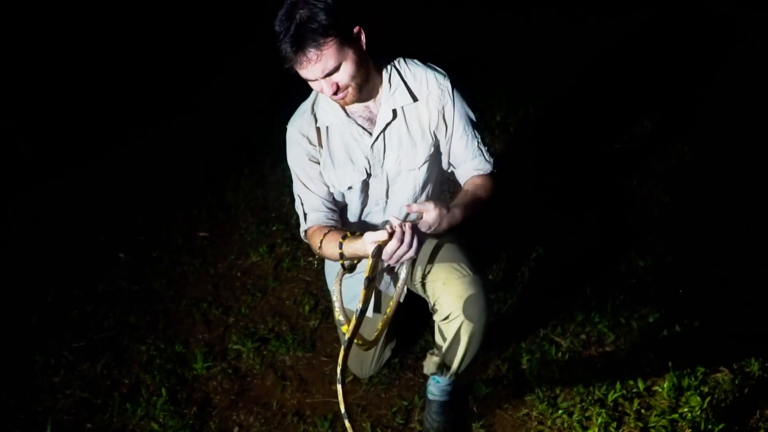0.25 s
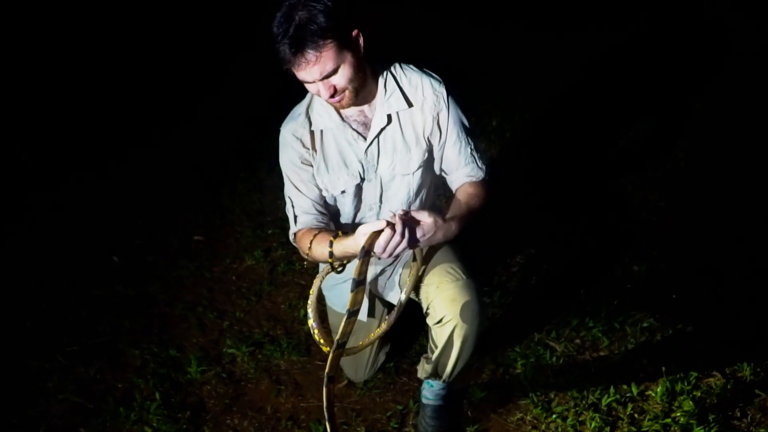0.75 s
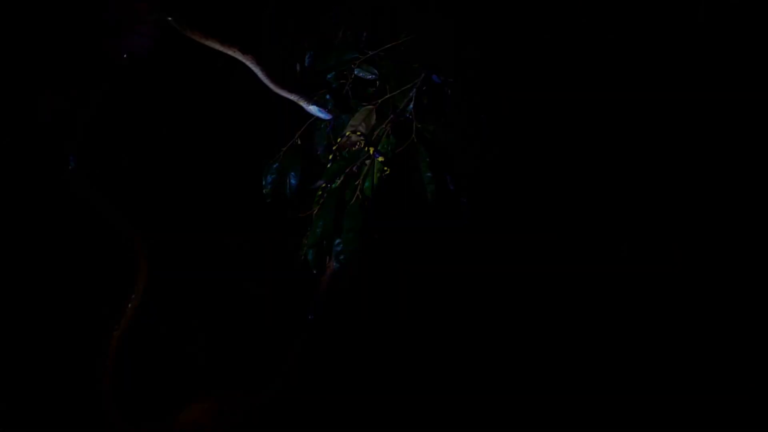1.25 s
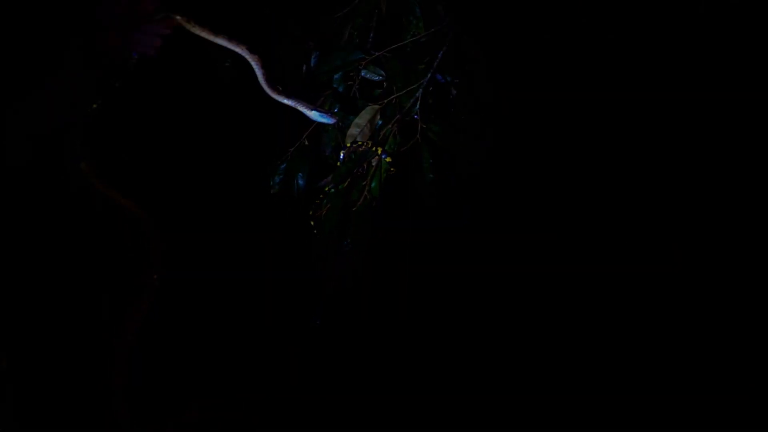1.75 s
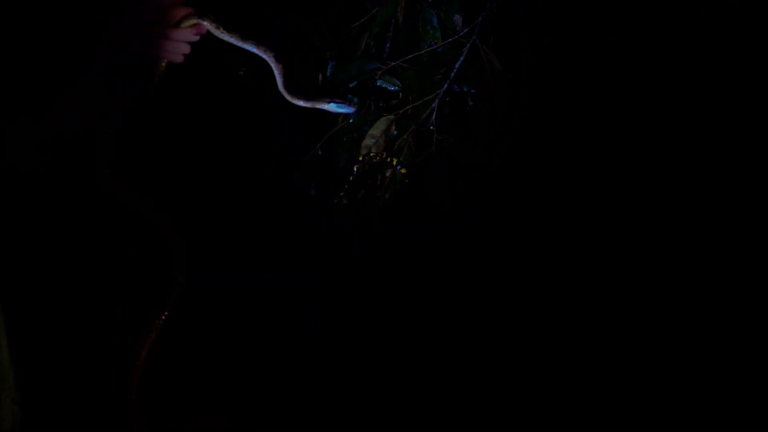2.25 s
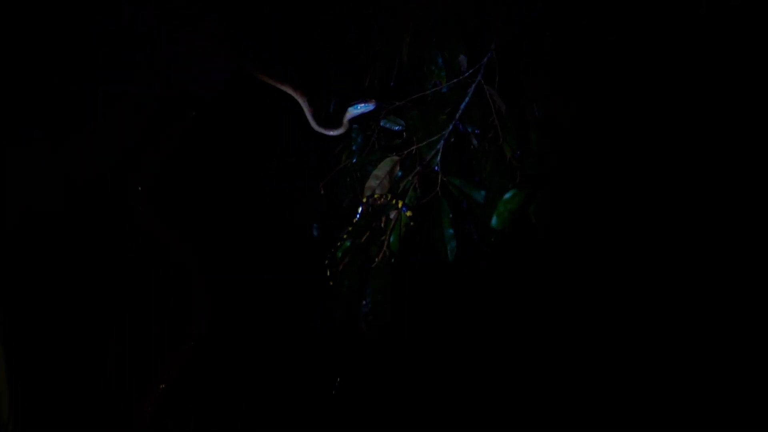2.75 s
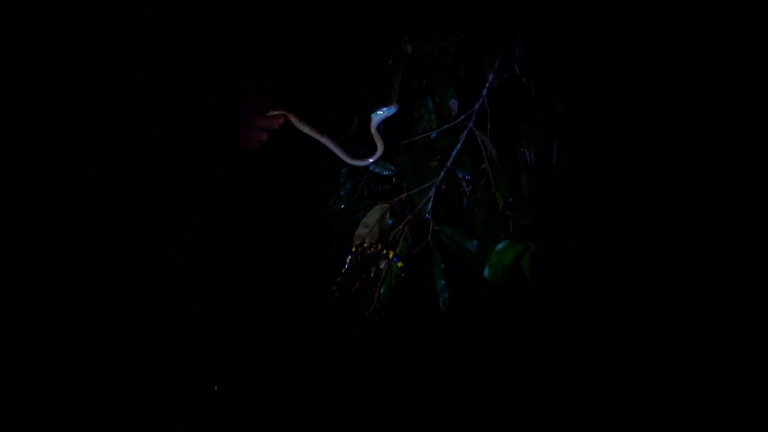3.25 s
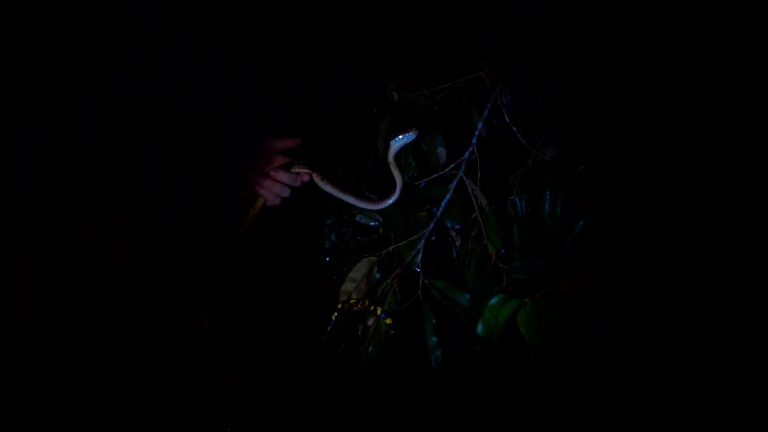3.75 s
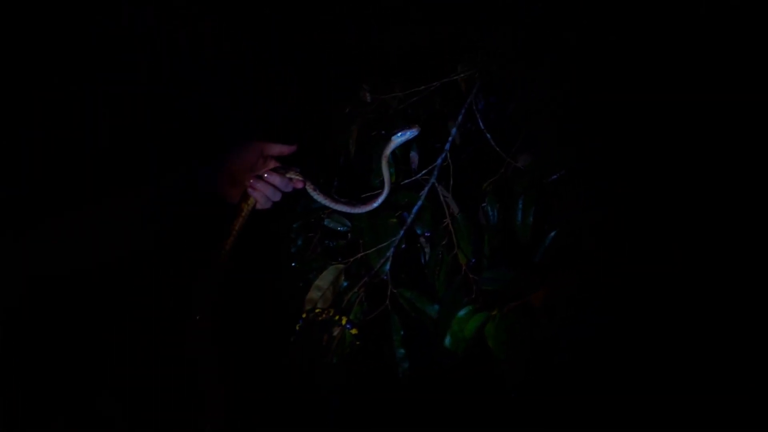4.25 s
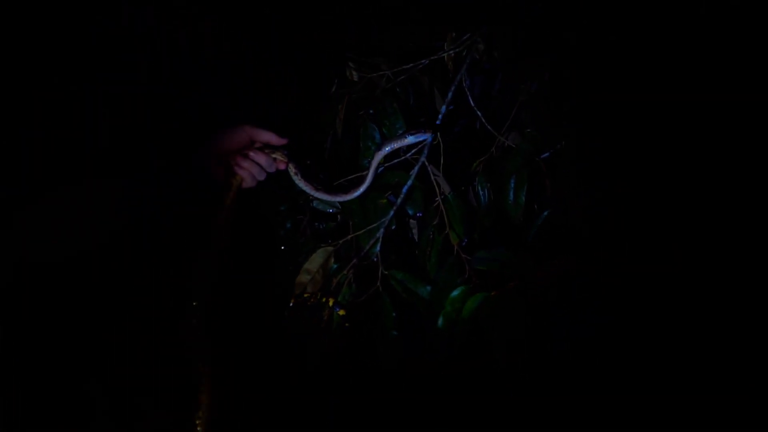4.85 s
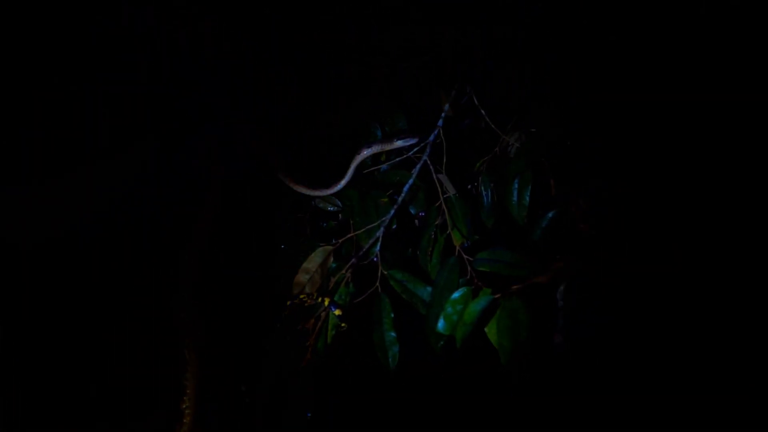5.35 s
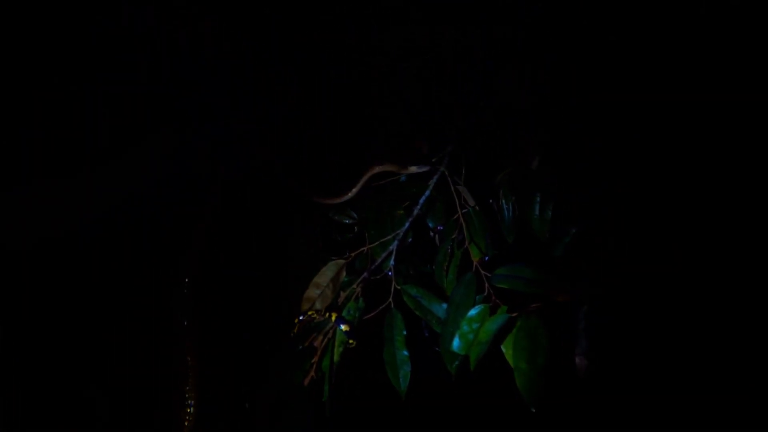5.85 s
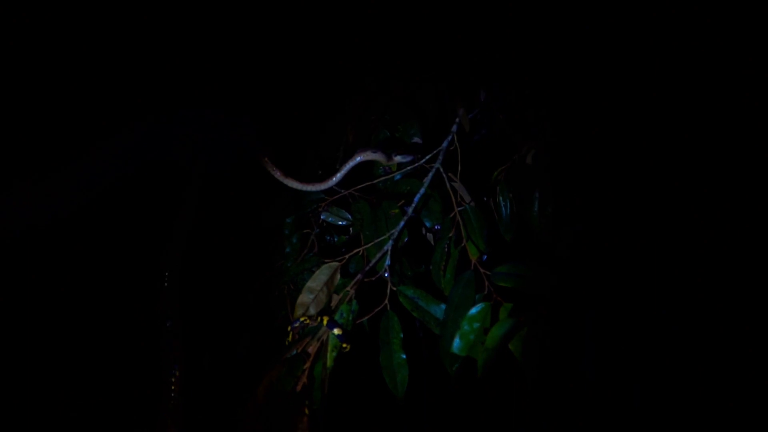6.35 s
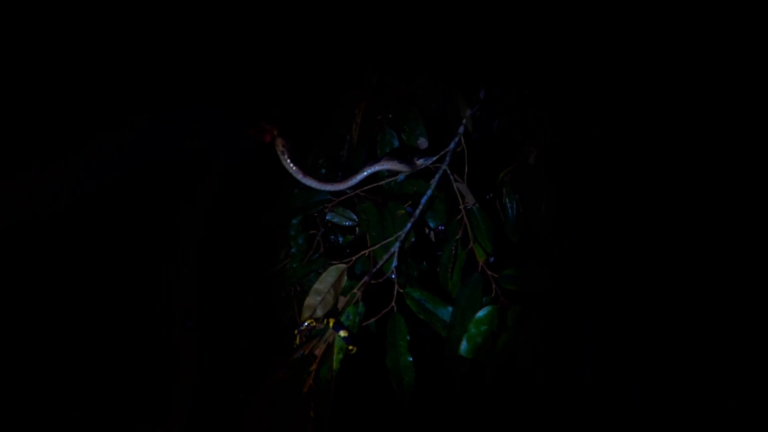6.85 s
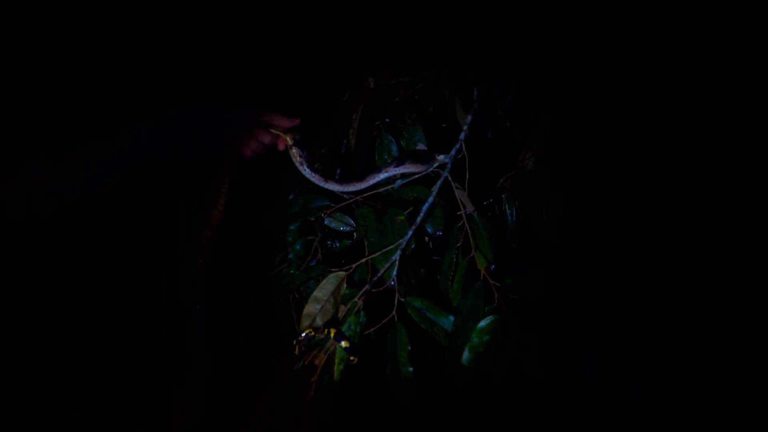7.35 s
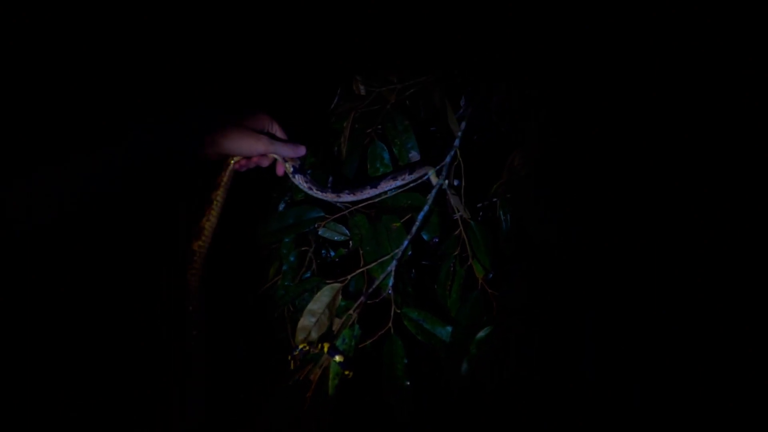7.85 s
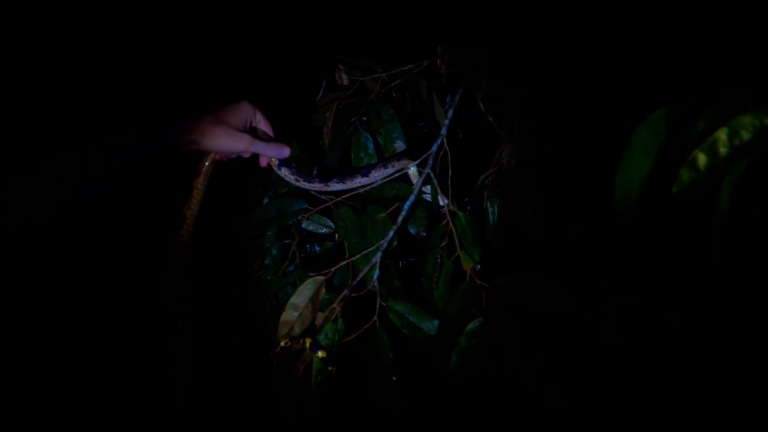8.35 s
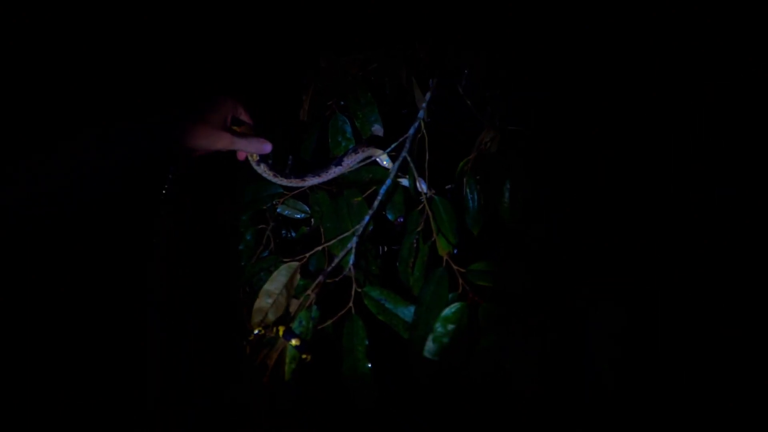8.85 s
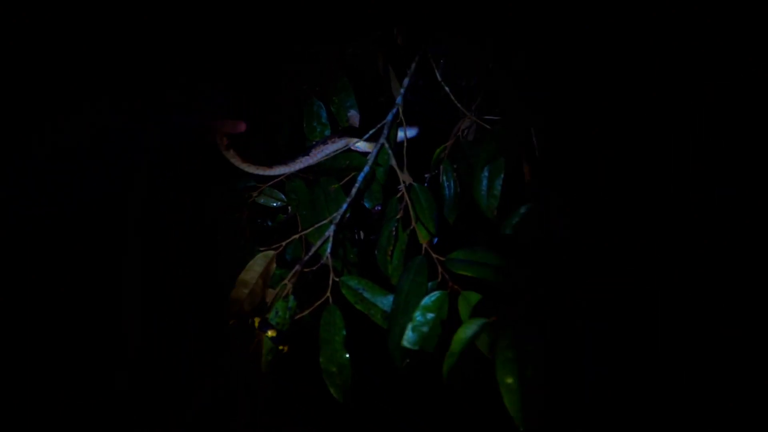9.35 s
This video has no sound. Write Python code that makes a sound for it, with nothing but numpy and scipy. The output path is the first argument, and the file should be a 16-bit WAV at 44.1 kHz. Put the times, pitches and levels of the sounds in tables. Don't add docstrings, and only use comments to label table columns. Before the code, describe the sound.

A stereo pair in a night forest hears insect and frog choirs trilling, with a rattling frog on the left. A hand gives a brief hollow knock, then a dry rasp. The scene cuts abruptly to a fuller, brighter chorus: close crickets chirp in phrases, katydids zip, twigs snap, a ticker swells, a frog croaks on the right and a small frog peeps steadily over soft air.

```python
import sys
import numpy as np
from scipy import signal
from scipy.fft import rfft, irfft, next_fast_len
from scipy.io import wavfile
from scipy.ndimage import uniform_filter1d

SR = 44100
rng = np.random.default_rng(int(sys.argv[2]) if len(sys.argv) > 2 else 0)


def wav_out(sig):
    wavfile.write(sys.argv[1], SR, np.round(np.clip(np.atleast_2d(sig).T, -1, 1) * 32767).astype(np.int16))


def volts_from_db(level):
    exponent = np.asarray(level, float) / 20
    return 10 ** exponent


N = 422919
CUT_S = 1.294


def evened(x):
    return x / np.sqrt(np.mean(abs(x) ** 2) + 1e-20)


def read(points, hz):
    f, value = np.transpose(points)
    return np.interp(np.log(hz + 1), np.log(f + 1), value)


def sides(pan_db):
    return volts_from_db(np.array([[pan_db / 2], [-pan_db / 2]]))


def add(mix, s, sound, pan_db=0):
    part = mix[:, round(s * SR):][:, :sound.shape[-1]]
    part += sides(pan_db) * sound[..., :part.shape[1]]


def alike(left, other, same):
    same = np.clip(same, -1, 1)
    return np.array([left, same * left + np.sqrt(1 - same ** 2) * other])


def wander(rows, size, count):
    points = rng.standard_normal((rows, count))
    return np.array([np.interp(np.linspace(0, count - 1, size), np.arange(count), p) for p in points])


def band(size, hz, width, same=.3):
    a, b = rng.standard_normal((2, size))
    bell = np.exp(-.25 * ((np.fft.rfftfreq(size, 1 / SR) - hz) / width) ** 2)
    return evened(irfft(rfft(alike(a, b, same)) * bell, size))


def swells(t, rows, half_s):
    return sum(db * np.exp(-.5 * ((t - s) / half_s) ** 2) for s, db in rows)


# pitch in Hz, level in dB per Hz.
AIR_LOW = [(15, -58), (25, -24), (116, -13), (171, -11.5), (284, -3.5), (395, -3), (571, -0.5), (910, -2.5),
           (1660, -3), (2600, -6), (3380, -24), (5720, -120)]
AIR_TOP = [(3200, -24), (8000, -7), (11000, -15), (13500, -10), (16000, -10.5)]
# pitch in Hz, likeness from -1 to 1.
AIR_LIKENESS = [(60, 0.94), (120, 0.98), (240, 0.77), (480, 0.13), (950, -0.15), (1890, 0.034),
                (3770, 0.37), (7520, 0.42), (15000, 0.049)]
# centre in seconds, rise in dB.
GUSTS = [
    (.75, 3.8),
    (2.3, 3),
    (5.0, 2),
    (7.5, 5.7),
]
# centre in seconds, change in dB.
HUSHES = [
    (1.7, -4),
    (5.1, -3),
    (5.6, -3),
    (6.3, -18),
    (6.5, -10),
    (6.8, -6),
    (7.33, -4),
    (8.58, -3),
    (9.17, -10),
]


def air():
    gust_s, hush_s, hush_hz = 0.18, 0.061, 14100
    rumble_grows_db_per_s = 1.5
    frames, hz = N // 256 + 5, np.fft.rfftfreq(1024, 1 / SR)
    t = np.arange(frames) * 256 / SR
    a, b, c, d, patches = rng.standard_normal((frames, 513, 5)).T
    patches = uniform_filter1d(patches, size=10, axis=0)
    patches = evened(uniform_filter1d(patches, size=10, axis=1))
    stir = (swells(t, GUSTS, gust_s) - .8) * np.exp(-hz / 900)[:, None]
    stir += rumble_grows_db_per_s * (t - 4.8) * np.exp(-hz / 90)[:, None]
    hush = swells(t, HUSHES, hush_s) / (1 + (hush_hz / (hz + 1)) ** 24)[:, None]
    flicker = wander(1, frames, count=frames // 3)
    z = alike(a + 1j * b, c + 1j * d, read(AIR_LIKENESS, hz)[:, None])
    colour_db = read(AIR_LOW[:-1] + AIR_TOP, hz)[:, None]
    z *= volts_from_db(colour_db + 0.66 * patches + 0.48 * flicker + stir + hush)
    wash = signal.istft(z, nperseg=1024, noverlap=768)[1][:, :N]
    return volts_from_db(-53 + 4.5) * evened(wash)


def haze(size, fill, same):
    a, b = rng.standard_normal((2, size))
    f = np.fft.rfftfreq(size, 1 / SR)
    power = 0
    for hz, width, db in fill:
        bell = np.exp(-.5 * ((f - hz) / width) ** 2)
        power = power + volts_from_db(2 * db) * bell * SR / (2 * np.sqrt(2 * np.pi) * width)
    return irfft(rfft(alike(a, b, same)) * np.sqrt(power), size)


def choir(size, hz, spread, fall, pulses, far, pan_db, same, count):
    t = np.arange(size // 12) * 12 / SR
    steps = len(t) // 700 + 3
    tempo, near, start = rng.standard_normal((count, 3)).T[..., None]
    pitch = np.tan(np.linspace(-1.1, 1.1, count))[:, None]
    beat = 2 * np.pi * pulses * (1 + .12 * tempo) * t + 9 * start + .5 * wander(count, len(t), count=steps)
    stroke = (.5 + .5 * np.cos(beat)) ** 1.5
    slide = fall / pulses * np.cos(beat)
    drift = 1.5 * wander(count, len(t), count=steps * 3)
    effort_db = 4.2 * wander(count, len(t), count=steps // 3 + 2)
    voices = volts_from_db(2.6 * near - 1.5 * pitch ** 2 + effort_db) * stroke
    voices = voices * np.exp(1j * (2 * np.pi * spread * pitch * t + slide + drift))
    scatter = np.sqrt(-2 * np.log(np.clip(abs(same), .01, .99)))
    bearing = np.exp(1j * scatter * rng.standard_normal((count, 1)))
    pair = [voices.sum(0), np.sign(same) * (voices * bearing).sum(0)]
    pair = signal.resample(pair, size, axis=1)
    close = (pair * np.exp(2j * np.pi * hz * np.arange(size) / SR)).real
    close /= np.sqrt(abs(uniform_filter1d((close ** 2).mean(0), size=SR // 3)) + 1e-9)
    far = np.clip(far, 0, 1)
    blur = band(size, hz, np.hypot(spread, 0.65 * fall), same)
    return (np.sqrt(1 - far) * close + np.sqrt(far) * blur) * sides(pan_db)


# centre in Hz, spread of voices in Hz, fall in a pulse in Hz,
# pulses per second, far blurred share from 0 to 1, left-right in dB, likeness of the ears from -1 to 1.
CHOIRS = [
    [(3260, 58, 143, 41, 0.7, 2, 0.38), (4680, 250, 120, 36, 0.4, 19.5, 0.3),
     (6157, 240, 300, 70, 0.83, 2, 0.14), (9580, 330, 300, 110, 0.54, 1, 0.1)],
    [(3332, 48, 152.5, 30, 0.36, 3, 0.57), (5050, 120, 120, 66, 0.65, -1, 0.04),
     (6415, 230, 235, 72, 0.7, 0, -.1), (9833, 330, 365, 124, 0.64, 1, 0.19)],
]
# low, middle, high and katydid choir in dB.
REST = [
    (-38, -61, -41.5, -45.5),
    (-38, -41.5, -39.5, -40),
]
VOICES = [8, 12, 14, 12]
# centre in seconds, rise in dB.
SURGES = [
    [(0, 2), (.6, 2.5), (1.2, 1), (1.6, 0.5), (2.05, 1), (2.5, -0.5), (3.05, 3), (3.55, -1), (4.1, 0.5),
     (4.8, -4), (5.5, 0.5), (6.0, -1.5), (6.5, 2), (6.85, 0), (7.2, -1), (7.7, 3.5), (8.1, 1.5),
     (8.36, -2.5), (8.8, 2), (9.3, -1)],
    [(1.75, -1.5), (2.5, 3), (4.45, -3), (6.03, 1.5), (8.35, 1)],
    [(1.7, 1), (2.3, 0.5), (4.65, 1), (9.3, 0.3)],
    [(1.35, 0.5), (2.1, 0.5), (3.0, 1), (3.85, 2), (4.95, 1), (5.8, 2.5), (6.25, -1), (6.62, 2.5),
     (6.92, -1.5), (7.3, 1.5), (7.8, -1.5), (8.1, 1.5), (9.4, 2)],
]
SURGE_S = [0.21, 0.14, 0.11, 0.098]
# pitch in Hz, width in Hz, level in dB.
FILL = [
    [(3850, 170, -51), (4660, 370, -53), (13500, 1100, -49.5), (2860, 210, -59)],
    [(3860, 89, -41.5), (4060, 70, -52), (4600, 190, -49.5), (7580, 200, -50), (8800, 510, -48),
     (2966, 108, -53.5), (5480, 140, -54), (11340, 960, -53)],
]


def chorus():
    out, edges = np.zeros((2, N)), [0, round(CUT_S * SR), N]
    for k, (rest, choirs, fill) in enumerate(zip(REST, CHOIRS, FILL)):
        t = np.arange(edges[k], edges[k + 1]) / SR
        part = out[:, edges[k]:edges[k + 1]]
        size = next_fast_len(len(t), True)
        for db, surges, half_s, voice, count in zip(rest, SURGES, SURGE_S, choirs, VOICES):
            effort = np.interp(t, t[::256], volts_from_db(db + 2.5 + swells(t[::256], surges, half_s)))
            part += effort * choir(size, *voice, count=count)[:, :len(t)]
        part += haze(size, fill, same=0.11)[:, :len(t)]
    return out


# pulses per second, left-right in dB, pulse depth,
# pitch rise in a pulse in radians, level in dB.
SOLOS = [
    (37.7, -3, .95, .55, 0),
    (38.3, -3, .75, -.45, -2.6),
    (17, 3, .7, -.5, -3),
    (52.8, .3, .45, .42, -2.8),
    (66.1, -.4, .5, .05, -1.5),
    (19.5, -.3, .7, .05, -1.5),
]
# pitch in Hz, level in dB, phrase length in seconds,
# list of phrase starts in seconds.
SINGERS = [
    [(3743, -48.5, 1.08, [3.8, 6.3, 8.52]), (3743, -49, .65, [1.3]), (3911, -63, 1.22, [.05]),
     (4025, -54, .95, [1.85, 7.2]), (4025, -55, 1.4, [4.4]), (4100, -60, 1.4, [4.4]),
     (3957, -53, .55, [5.2]), (3668, -59, 1, [3.75, 6.25, 8.5])],
    [(3868, -46.5, .62, [2.98, 5, 5.57, 7.78, 8.33]), (3795, -49.5, .65, [2.3, 3, 5.5, 7.9]),
     (3911, -52, .39, [9.2])],
    [(3549, -46.5, .45, [1.45, 2.75, 5.15, 6.3, 7.7]), (3542, -49, .15, [9.15])],
]
OTHER_SINGERS = [
    [(5290, -47.5, .65, [4.33, 4.82]), (5296, -43.5, .9, [5.3]), (5339, -55, 1.9, [2.7]),
     (5279, -55, .7, [1.3, 2.65, 6.85]), (5500, -59, 1.5, [3.25]), (5500, -63, .7, [5.4])],
    [(4957, -51, 1.8, [2.7]), (4670, -56, 3.1, [1.3]), (4827, -51, .3, [6.8]),
     (7666, -62, 2.3, [4.3, 7.25]), (7667, -62, 1.3, [1.3]), (7876, -58, .3, [6.6]),
     (8007, -58, .25, [6.62, 9.1]), (7060, -62, 1, [1.4, 2.8])],
    [(1676, -71, .35, [2.1, 3.65, 5.05, 7.9, 9.1])],
]


def solos():
    out = np.zeros((2, N))
    for (pulses, pan_db, depth, rise, kind_db), singers in zip(SOLOS, SINGERS + OTHER_SINGERS):
        phrases = [(hz, db, length, s) for hz, db, length, starts in singers for s in starts]
        for hz, db, length, s in phrases:
            t = np.arange(round(length * SR)) / SR
            slow = wander(3, len(t), count=int(length * 12) + 3)
            beat = 2 * np.pi * (pulses * t + rng.random()) + 0.23 * slow[0]
            ears = np.array([[0], [0.6 * rng.standard_normal() - .4]])
            note = 2 * np.pi * hz * t + rise * np.sin(beat) + 0.9 * slow[1] + ears
            fade = np.clip(np.minimum(t / 0.091, (length - t) / 0.058), 0, 1)
            level = volts_from_db(db + kind_db + 6.5 + 1.2 * slow[2]) * fade
            add(out, s, level * (1 + depth * np.cos(beat)) * np.cos(note), pan_db)
    return out


# start in seconds, peak in dB, pitch in Hz, left-right in dB.
SNAPS = [(0.739, -44, 665, -2), (1.374, -39, 1440, -1), (1.578, -41, 2170, -3), (1.66, -34, 1540, -4),
         (2.956, -40, 982, -4), (3.655, -46, 1580, 1.0), (4.303, -43, 662, -1.0), (4.545, -37.5, 1570, -6),
         (5.006, -42, 1050, -1.0), (5.792, -39, 560, -3), (6.019, -42, 1320, -8), (8.052, -38, 1530, -0.5),
         (8.277, -40, 1730, -0.5), (8.445, -44, 616, -0.5), (8.956, -35, 1320, 6), (8.974, -42, 1700, 3),
         (9.058, -38, 1300, -6), (9.074, -40, 2160, -8.5), (9.175, -43, 600, 0), (9.253, -41, 1700, 0),
         (9.303, -34.5, 2610, -9), (9.574, -41, 1050, -9)]


def snaps():
    out, t = np.zeros((2, N)), np.arange(1200) / SR
    for s, db, hz, pan_db in SNAPS:
        crack = band(len(t), 400 + .8 * hz, 270 + .2 * hz, same=0.91)
        crack = crack + 0.4 * np.sin(2 * np.pi * hz * t)
        add(out, s, volts_from_db(db - 5 - 60 * t / 0.041) * crack * np.minimum(t / 0.001, 1), pan_db)
    return out


# pitch in Hz, level in dB, time to fall 60 dB in seconds.
KNOCK = [
    (164, -38, 0.038),
    (310, -32, 0.019),
    (242, -47, 0.12),
    (441, -38, 0.12),
    (490, -34, 0.015),
    (550, -42, 0.13),
    (664, -53, 0.12),
    (760, -32, 0.014),
    (1460, -28, 0.0073),
    (2170, -34, 0.0068),
]


def hand_knock():
    out, t = np.zeros((2, N)), np.arange(6000) / SR
    start_s = .5125
    knock = sum(-volts_from_db(db - 60 * t / t60) * np.sin(2 * np.pi * hz * t) for hz, db, t60 in KNOCK)
    low_cut = signal.butter(2, 90, "high", fs=SR, output="sos")
    knock = signal.sosfilt(low_cut, knock * np.minimum(t / .0003, 1))
    add(out, start_s, knock, -.8)
    bounce = uniform_filter1d(knock, size=30)
    add(out, start_s + 0.00608, volts_from_db(-6.0) * bounce, -.8)
    add(out, start_s + 0.0125, volts_from_db(-14) * bounce, -.8)
    return out


TICKS = [2.5471, 2.6259, 2.7018, 2.7776, 2.8539, 2.9297, 3.0106, 3.0909, 3.1722, 3.2565]


def ticks():
    out, t = np.zeros((2, N)), np.arange(6000) / SR
    for s in TICKS:
        decay = volts_from_db(-8 - 60 * t / .012) + volts_from_db(-8 - 60 * t / .35)
        level = volts_from_db(-49 + 10 * (s - TICKS[0]))
        add(out, s, level * decay * band(len(t), 14500, 700, same=.55), 4.5)
    return out


# start in seconds, length in seconds, pitch in Hz, width in Hz, level in dB.
RASPS = [(.62, .09, 10150, 600, -38.5), (.652, .036, 10050, 230, -38), (.63, .07, 11900, 900, -46),
         (6.12, .25, 13000, 250, -55), (6.2, .55, 13400, 230, -52), (9.08, .2, 13000, 250, -56),
         (9.15, .33, 13400, 230, -51), (3.435, .07, 5950, 250, -39), (3.455, .07, 6300, 250, -39),
         (3.48, .08, 6750, 350, -40.5), (3.45, .14, 7600, 700, -42.5), (2.8, .25, 12300, 900, -57)]
# start in seconds, level in dB, pitch in Hz.
SCRAPES = [(1.37, -53, 11500), (2.33, -47, 12000), (2.5, -46.5, 11500), (3.27, -48, 13500),
           (3.53, -46.5, 11900), (3.84, -48, 14500), (4.45, -47.5, 14000), (4.88, -45.5, 12400),
           (5.45, -51, 12000), (6.93, -45, 13200), (7.24, -50, 12300), (8.0, -48, 14300),
           (8.74, -48, 11700), (9.25, -52, 12500)]
GRUNTS = [1.72, 4.96, 7.2, 8.99]
# length in seconds, pitch in Hz, width in Hz, level in dB.
GRUNT = (.105, 2780, 70, -51)


def rasps():
    out, tail = np.zeros((2, N)), np.arange(9000) / SR
    scrapes = [(s - .02, .18, hz, .16 * hz, db) for s, db, hz in SCRAPES]
    grunts = [(s, *GRUNT) for s in GRUNTS]
    for s, length, hz, width, db in RASPS + scrapes + grunts:
        size = round(length * SR)
        grain = volts_from_db(2 * wander(1, size, count=size // 150))
        soft = signal.windows.tukey(size, min(1, .3 / length))
        add(out, s, volts_from_db(db) * grain * band(size, hz, width, same=0.83) * soft, .9)
        echo = volts_from_db(db - 60 * tail / 0.49) * np.minimum(tail / 0.02, 1)
        add(out, s + 0.54 * length, echo * band(len(tail), hz, width, same=.2), .9)
    return out


# start in seconds, length in seconds, level in dB.
ZIPS = [(.07, .08, -52), (.19, .11, -53), (.55, .07, -50), (.73, .08, -55), (1.1, .1, -51),
        (1.24, .05, -54), (1.66, .08, -52), (1.76, .06, -56), (2.26, .08, -52), (2.83, .08, -56),
        (3.3, .1, -54), (3.93, .11, -51), (4.48, .09, -55), (5.57, .1, -51), (6.23, .1, -52),
        (6.35, .1, -57), (6.73, .11, -51), (7.27, .11, -54), (8.01, .12, -54), (8.5, .11, -54),
        (9.09, .09, -52)]
# file teeth struck per second, wing pitch in Hz.
KATYDIDS = [
    (328, 11250),
    (338, 12050),
]
# distance from the main pitch in Hz, level in dB.
WING = [
    (-900, -4),
    (0, 0),
    (1250, -8),
]


def zips():
    out, ring_t60_s = np.zeros((2, N)), 0.39
    for s, length, db in ZIPS:
        teeth, wing_hz = KATYDIDS[int(s > CUT_S)]
        t = np.arange(round((length + 0.14) * SR)) / SR
        ring = np.minimum(t / .025, 1) * volts_from_db(-60 * np.maximum(t - 0.72 * length, 0) / ring_t60_s)
        hz = teeth * np.arange(29, 44)[:, None]
        shape = sum(volts_from_db(d) / (1 + ((hz - wing_hz - off) / 330) ** 2) for off, d in WING)
        phase = rng.random((15, 1)) + .25 * rng.random((2, 15, 1))
        uneven_db = 2.6 * rng.standard_normal(hz.shape) + 3.1 * wander(len(hz), len(t), count=7)
        comb = shape * volts_from_db(uneven_db) * np.cos(2 * np.pi * (hz * t + phase))
        add(out, s - .01, volts_from_db(db + 2.5) * evened(comb.sum(1)) * ring, .3)
    return out


PEEPS = [4.6104, 4.8644, 5.1048, 5.3448, 5.5862, 5.8287, 6.0686, 6.316, 6.564, 6.8104, 8.8912, 9.1292,
         9.3576]


def peeps():
    out, t = np.zeros((2, N)), np.arange(1500) / SR
    for s in PEEPS:
        tone = np.sin(2 * np.pi * 6943 * t + np.array([[0], [1.5]]))
        level = volts_from_db(-32.5 + 0.52 * (s - PEEPS[0]))
        note = level * signal.windows.tukey(len(t), .45) * tone
        add(out, s - .003, note)
        add(out, s + 0.027, volts_from_db(-9) * note[::-1])
    return out


# last stroke in seconds, level in dB, pitch in Hz, left-right in dB.
CROAKS = [(.1418, -46, 4600, 13), (.4404, -44, 4600, 11), (.7359, -44.5, 4600, 11), (1.0379, -45, 4600, 9),
          (1.2597, -45, 4600, 11), (2.7561, -49, 4375, -8), (3.0047, -46, 4375, -9),
          (3.2915, -46, 4375, -8), (3.5764, -46, 4375, -9), (3.8572, -44.5, 4375, -11),
          (4.1474, -38.5, 4375, -11), (4.4318, -39, 4375, -12), (4.7322, -39.5, 4375, -11),
          (5.044, -39, 4375, -10), (5.3305, -39.5, 4375, -11), (9.4863, -47, 4375, 0)]
CROAK_GAP_S = [.0232, .0241]
STROKE_FALLS_HZ_PER_S = [28000, 46000]
CROAK_SWELL = [-9, -3, -1, 0, -1, 0, 0]


def croaks():
    stroke_s = .017
    out, t = np.zeros((2, N)), np.arange(-stroke_s / 2, stroke_s / 2, 1 / SR)
    for last, db, hz, pan_db in CROAKS:
        spot = int(last > CUT_S)
        starts = last - stroke_s / 2 - CROAK_GAP_S[spot] * np.arange(len(CROAK_SWELL))[::-1]
        chances = rng.standard_normal((len(starts), 3))
        for s, swell_db, (a, b, c) in zip(starts, CROAK_SWELL, chances):
            glide = (hz + 25 * a) * t - STROKE_FALLS_HZ_PER_S[spot] * t ** 2 / 2
            note = 2 * np.pi * glide + np.array([[0], [1.1]]) + 3 * b
            stroke = volts_from_db(db + 1.5 + swell_db + 0.89 * c) * np.hanning(len(t)) * np.cos(note)
            add(out, max(s, 0), stroke, pan_db)
            add(out, max(s, 0) + .009, volts_from_db(-10) * stroke, 0)
        size = round(.2 * SR)
        blur = volts_from_db(-48.5 + .5 * (db + 36.5)) * band(size, hz, 320, same=0.33) * np.hanning(size)
        add(out, max(starts[0], 0), blur, pan_db / 4)
    return out


# middle stroke in seconds, phrase length in seconds, level in dB.
LEAD = [
    [(2.0598, .5, -38.5), (3.0598, .45, -41), (4.0442, .5, -41), (5.4591, .45, -38.5), (6.6163, .4, -41),
     (7.4219, .3, -43), (7.79, .3, -43), (8.8179, .6, -38.5)],
    [(2.4245, .35, -43), (3.609, .35, -43), (4.519, .3, -42), (5.9322, .4, -41), (7.0136, .45, -41),
     (9.367, .4, -43)],
    [(.4981, .6, -52), (1.0414, .3, -54)],
]
LEAD_PULSES_PER_S = [30.0, 19.5, 36.9]
# pitch in Hz, fall in a stroke in Hz, sharpness, left-right in dB, level in dB.
LEAD_STROKES = [
    (3335, 195, 1.7, 7, 8.5),
    (3220, 230, 4, 10, 8.5),
    (4045, 60, 2.5, 12, 8),
]
# delay in seconds, level in dB.
LEAD_ECHOES = [
    (.0043, -10),
    (.0107, -10),
    (.0188, -11),
    (.026, -12),
]


def lead():
    out = np.zeros((2, N))
    for phrases, pulses, stroke in zip(LEAD, LEAD_PULSES_PER_S, LEAD_STROKES):
        hz, fall, sharp, pan_db, kind_db = stroke
        for s, length, db in phrases:
            t = np.arange(-length * .75, length * 0.77, 1 / SR)
            slow = wander(2, len(t), count=int(length * 25) + 3)
            beat = 2 * np.pi * pulses * t
            slide = fall / pulses * np.cos(beat)
            note = 2 * np.pi * hz * t + slide + 0.45 * slow[0] + np.array([[0], [.8]])
            strokes = (.5 + .5 * np.cos(beat)) ** sharp
            swell = volts_from_db(db + kind_db + 1.0 * slow[1]) * signal.windows.tukey(len(t), .66)
            chirps = swell * strokes * np.cos(note)
            add(out, s + t[0], chirps, pan_db)
            for k, (delay_s, echo_db) in enumerate(LEAD_ECHOES):
                flip = np.array([[1], [(-1) ** k]])
                add(out, s + t[0] + delay_s, volts_from_db(echo_db) * chirps * flip, pan_db - 7.0)
    return out


def scene():
    background = air() + chorus() + solos()
    details = snaps() + hand_knock() + ticks() + rasps() + zips()
    return background + details + peeps() + croaks() + lead()


def roll_off(x):
    return signal.sosfilt(signal.butter(12, 15815, fs=SR, output="sos"), x)


def record(dry):
    fade_out_s, fade_in_s = 0.026, 0.002
    t = np.arange(N) / SR - CUT_S
    splice = np.clip(np.maximum(-t / fade_out_s, t / fade_in_s), 0, 1)
    low_cut = signal.butter(3, 70, "high", fs=SR, output="sos")
    joined = signal.sosfilt(low_cut, dry * splice)
    top_edge = signal.firwin(1023, 15795, window=("kaiser", 10), fs=SR)
    return roll_off(signal.oaconvolve(joined, top_edge[None], "same"))


dry = scene()
out = record(dry)
wav_out(out)
```